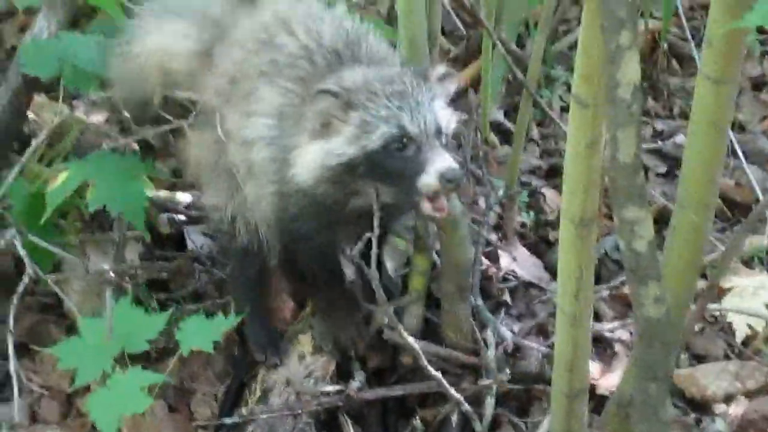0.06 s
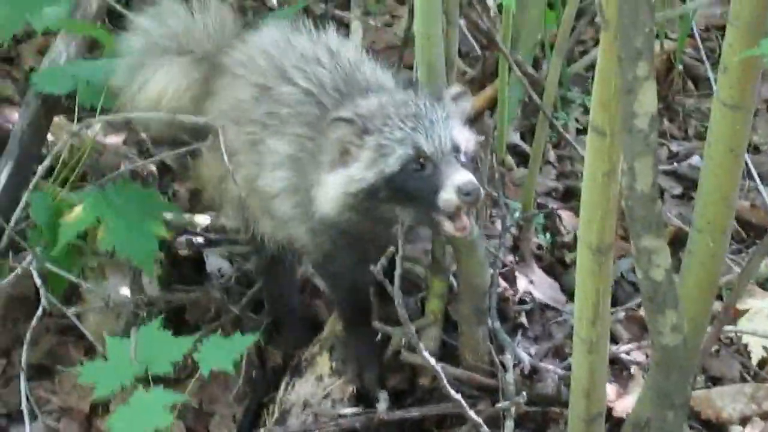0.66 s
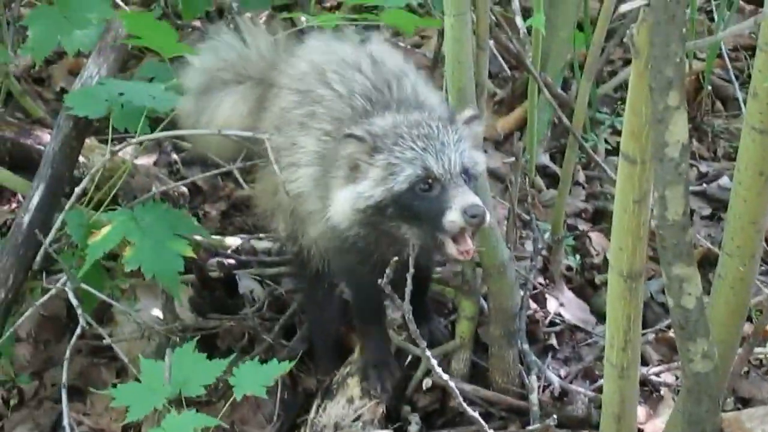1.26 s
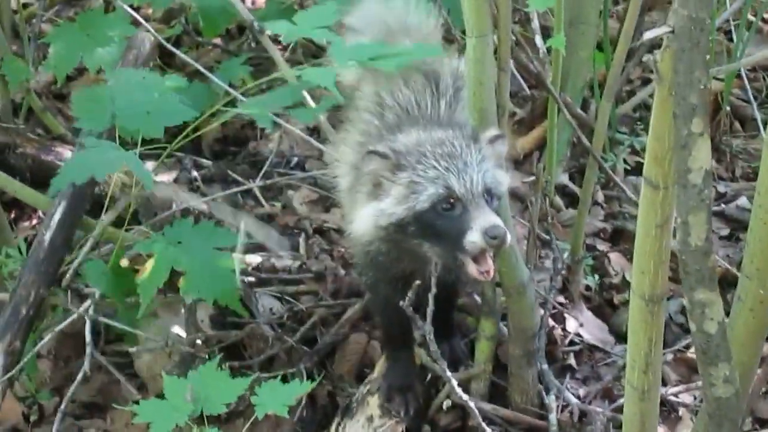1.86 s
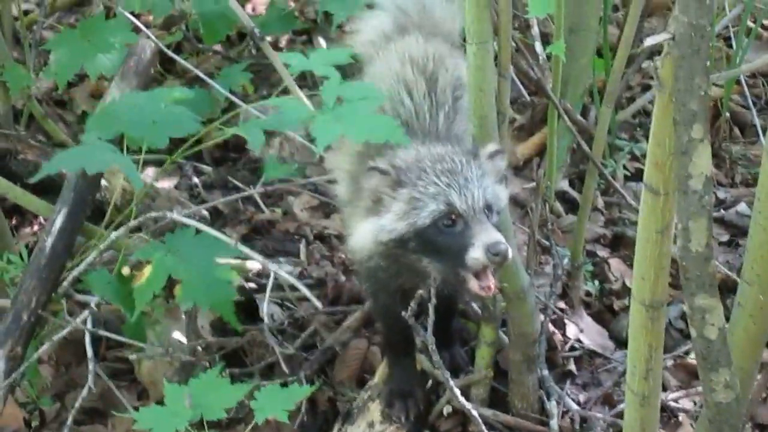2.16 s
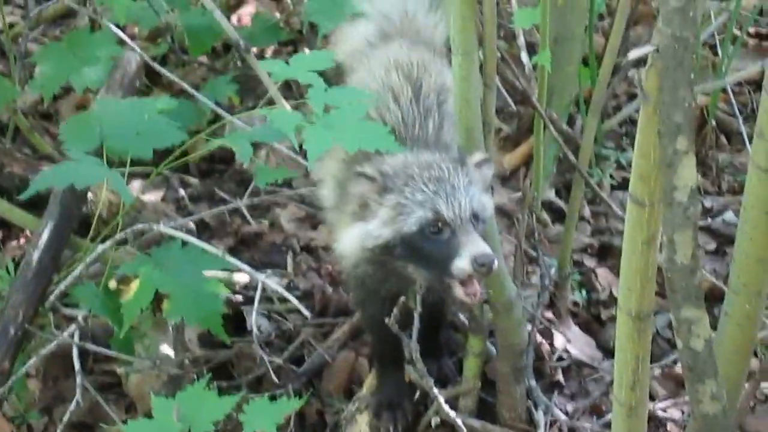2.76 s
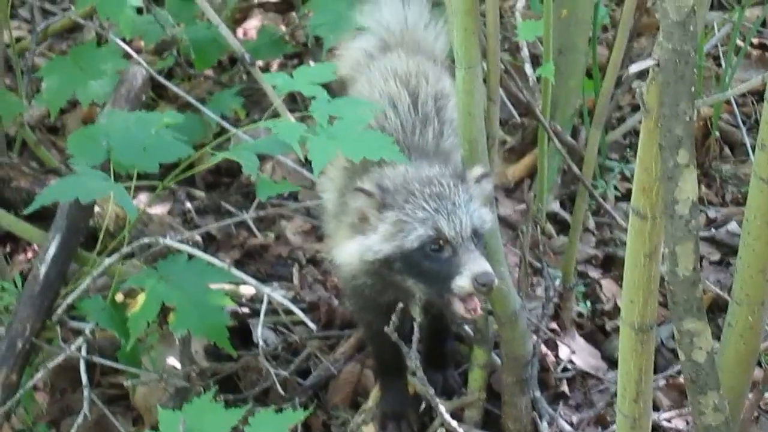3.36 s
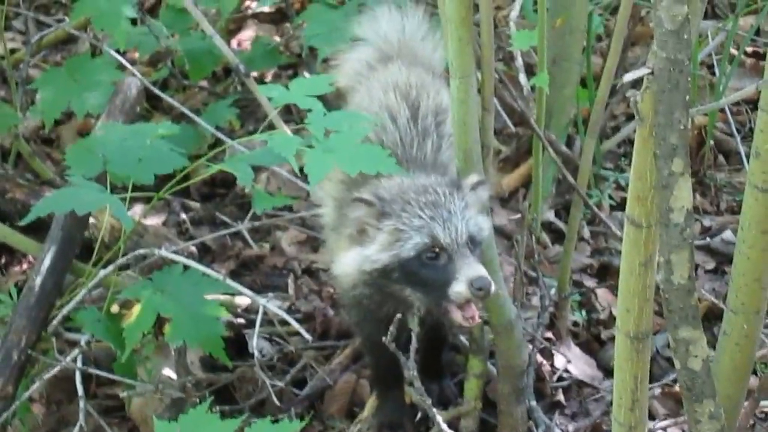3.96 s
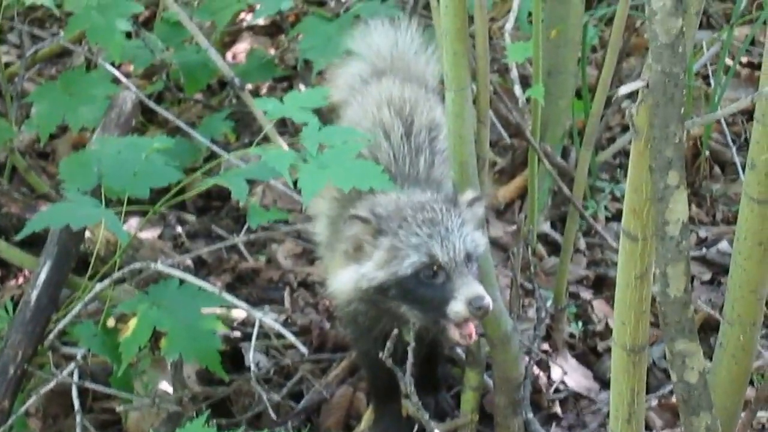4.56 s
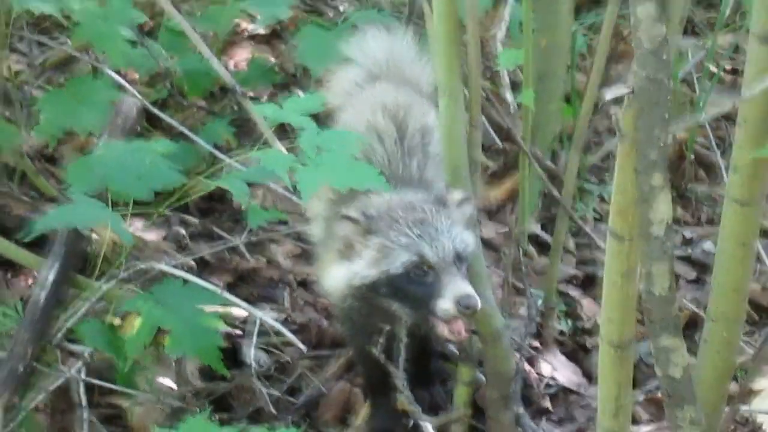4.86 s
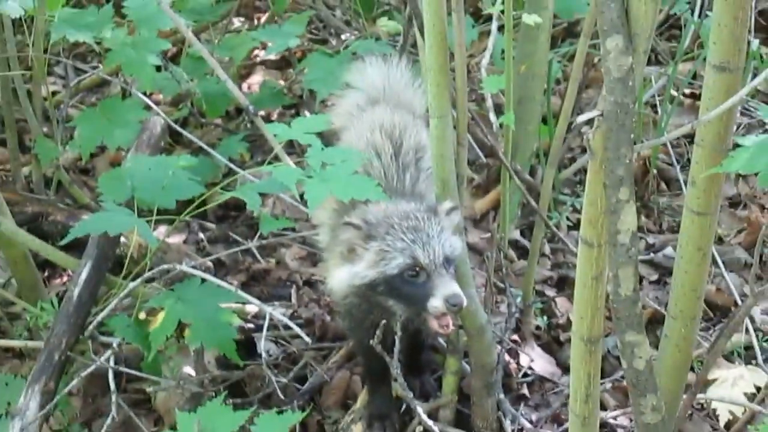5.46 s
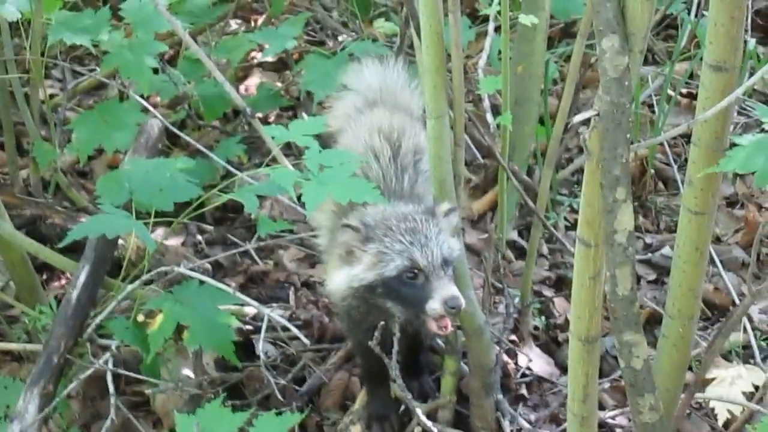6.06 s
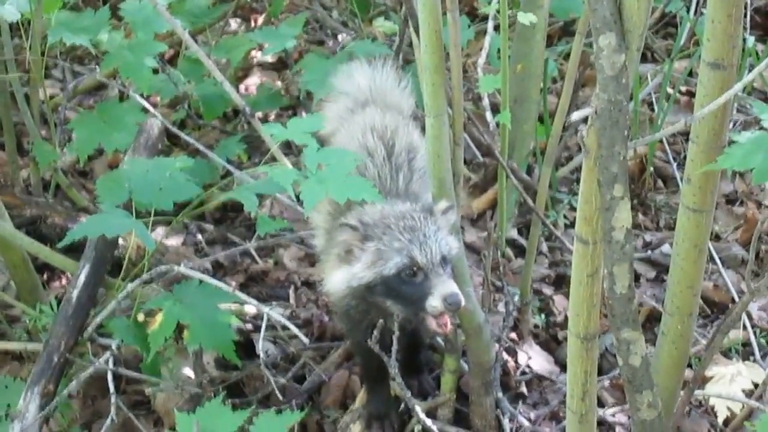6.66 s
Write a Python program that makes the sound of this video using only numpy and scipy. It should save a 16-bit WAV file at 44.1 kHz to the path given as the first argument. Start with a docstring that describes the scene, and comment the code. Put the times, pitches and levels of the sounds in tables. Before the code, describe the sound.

A raccoon dog pup yelps close by on a quiet woodland floor. Each yelp is short and hoarse, arching up in pitch, cracking at the top and falling away with a faint echo among the trees. The yelps come at about 0.2, 0.7, 1.0, 1.5, 1.9, 2.3, 2.8 and 3.3 seconds, slightly louder at 3.9 and 4.5, then further apart at 5.2 and 6.3, with a last one around 6.7. Soft hisses through the snout and a stuttering squeak sound in the first 0.7 seconds. A thin, quavering whine runs between the calls from 0.8 to 2.2 seconds. Faint low growls fill several gaps up to 4.4 seconds, followed by a run of soft grunts near 5 seconds and a small dry tick at 5.3. Dry leaves stir very faintly in the first half, over barely audible still air.

```python
"""On a woodland floor, a raccoon dog pup yelps thirteen times, close by.
Each yelp is an arch of pitch that rises out of a low growl; at its top the vocal folds break into period
doubling, and the overtones flare as they cross the resonances of jaw and mouth. Between yelps the pup
growls, whines, squeaks, grunts and hisses through its snout. Jaws and dry leaves tick, leaves stir over
a bed of still air, and reflections from the trunks let the wood ring on."""
import sys
import numpy as np
from scipy import signal
from scipy.fft import rfft, irfft, next_fast_len
from scipy.io import wavfile
from scipy.ndimage import uniform_filter1d, minimum_filter1d

SR = 44100
rng = np.random.default_rng(int(sys.argv[2]) if len(sys.argv) > 2 else 0)


def transcribe(signal):
    """Save signal, clipped to [-1, 1], as a 16-bit WAV file at the path in sys.argv[1]."""
    frames = np.atleast_2d(signal).T
    limited = np.clip(frames, -1, 1)
    pcm = np.round(limited * 32767).astype(np.int16)
    wavfile.write(sys.argv[1], SR, pcm)


N = 295470
TIME = np.arange(N) / SR

# The bed of still forest air. Each row: frequency in Hz, gain in dB.
FOREST_AIR_EQ = [(25, -8), (60, -6.5), (200, -11.5), (500, -11), (1200, -22), (2500, -23.5), (4000, -30.5),
                 (8000, -41), (15000, -42.5)]
# The tone of the echo off the trunks. Each row: frequency in Hz, gain in dB.
ECHO_EQ = [(150, -21), (480, -8.5), (720, -7), (870, -1.5), (1000, 3), (1230, -12), (1550, 4), (2000, 3.5),
           (2600, 4), (4000, 0), (6500, 4.5), (10000, -8.5)]
# Dry leaves stirring. Each row: start in seconds, end in seconds, level in dB.
RUSTLE_CUES = [(0, .12, -74), (0.488, .92, -75), (2.52, 3.15, -76)]
# The sizzle of the leaves. Each row: frequency in Hz, gain in dB.
RUSTLE_EQ = [(3000, -9.5), (4500, -4.5), (5800, 1), (6800, -6), (7900, -6.5), (8700, 3), (9400, -13.5),
             (14000, -24)]
# Small dry ticks of the jaws and leaf litter. Each row: start in seconds, relative level in dB.
TICK_CUES = [(.5082, -54.5), (2.4075, -59.5), (4.693, -60), (4.7375, -60), (4.7863, -59.5), (5.2946, -43),
             (5.3118, -36.5)]
# The snap of a tick. Each row: frequency in Hz, gain in dB.
TICK_EQ = [(1200, -24.5), (2300, 0), (3000, 5), (4200, -12), (7000, -16.5), (14000, -38.5)]
# Hisses through the snout. Each row: start in seconds, end in seconds, level in dB.
HISS_CUES = [(0, .13, -53.5), (0.4, 0.666, -48), (2.576, 2.705, -56)]
# The tone of the snout. Each row: frequency in Hz, gain in dB.
HISS_EQ = [(300, -12), (700, -2), (1200, -7), (1620, 5), (2050, -15.5), (2480, -1), (2900, -13),
           (3600, -34.5), (5000, -34), (7200, -36.5), (9000, -32.5), (13000, -52.5)]
# Bright breath in the yelps and the squeak. Each row: frequency in Hz, gain in dB.
BREATH_EQ = [(1800, -23), (3000, -5), (3700, -2.5), (4700, -1), (6200, 3.5), (7500, -6), (9000, -13),
             (11000, -12.5), (13000, -22.5), (15500, -19)]
# The whine's contour, in four joined phrases.
# Each row: time in seconds, second harmonic in Hz, relative level in dB.
WHINE_PHRASES = [
    [(0.79, 1396, -45), (0.864, 1419, -42.5), (0.878, 1367, -47), (0.93, 1432, -39.5)],
    [(1.09, 1428, -42.5), (1.19, 1549, -45), (1.274, 1494, -43.5), (1.42, 1527, -46)],
    [(1.58, 1407, -48), (1.596, 1401, -49), (1.822, 1359, -52), (1.83, 1347, -56.5)],
    [(2.02, 1371, -56.5), (2.058, 1410, -50.5), (2.138, 1419, -53.5), (2.17, 1403, -53)],
]
# The whine's nasal tone. Each row: frequency in Hz, gain in dB.
WHINE_EQ = [(450, -17), (720, -17), (1100, -8.5), (1450, -1.5), (2150, -9.5), (2900, -7.5), (3600, -26),
            (4400, -42), (6500, -54.5)]
# Growls between yelps. Each row: start in seconds, end in seconds, first pitch in Hz, last pitch in Hz,
# level in dB, mouth opening as overtone gain in dB.
GROWL_CUES = [(0.818, 0.958, 135.4, 107, -45.5, 1), (2.01, 2.202, 136.7, 114, -47.5, 0),
              (2.357, 2.449, 157.5, 106.4, -46.5, 1), (3.36, 3.437, 162.8, 109.3, -48, 2),
              (3.716, 3.825, 97, 116, -48, -1.5), (4.258, 4.365, 98.2, 114.1, -47, -10.5)]
# The growl's dark overtones. Each row: frequency in Hz, gain in dB.
GROWL_EQ = [(120, -21.5), (250, -11), (380, -1.5), (550, 5.5), (800, -16.5), (1200, -10), (1800, -21.5)]
# Hoarse air before the throat shapes it. Each row: frequency in Hz, gain in dB.
RASP_EQ = [(250, -19.5), (500, -1.5), (1200, 0.0), (2500, 15)]
# The throat's broad tone. Each row: frequency in Hz, gain in dB.
THROAT_EQ = [(60, -60.5), (180, -51.5), (280, -19), (390, -10), (490, -3), (700, 0), (950, -4.5),
             (1300, -7), (1650, -10), (2100, -17.5), (2550, -18), (2900, -36), (3400, -48.5), (5000, -78)]
# The yelps. Each row: top of the arch in seconds, top pitch in Hz, rise in seconds, release in seconds,
# relative held level in dB, period doubling in dB, jaw resonance in Hz, mouth resonance in Hz,
# nasal resonance in dB.
YELP_CUES = [(0.223, 508, .082, 0.045, -15, -11.5, 622, 1125, 1),
             (.731, 513.2, 0.083, 0.039, -12, -3.5, 599, 1150, 10.5),
             (1.030, 487, 0.086, .045, -16.5, -11, 530, 1143, -2),
             (1.516, 495.7, 0.078, 0.047, -12, -1.5, 537, 1142, 12),
             (1.931, 495, 0.075, 0.051, -13.5, -8, 565, 1150, 6),
             (2.262, 479.2, 0.071, 0.064, -13, -8.5, 540, 1213, -1.5),
             (2.803, 497.3, 0.081, 0.048, -12, -1, 576, 1196, -9.5),
             (3.285, 492, 0.076, .052, -12, -4, 616, 1239, -15.5),
             (3.903, 505.8, .087, 0.052, -9, 4, 619, 1260, -5.5),
             (4.451, 499.7, 0.091, 0.053, -10, 4, 689, 1267, -3),
             (5.248, 501, 0.083, 0.056, -14.5, 0.5, 734, 1243, -6),
             (6.254, 513.7, 0.085, 0.043, -13.5, 2, 713, 1268, -2.5),
             (6.697, 510.6, 0.079, .047, -17.5, -26, 683, 1248, -4)]

RELEASE_DB = 28   # how far a yelp drops before its muttering tail


def from_db(db):
    """Decibels to gain."""
    return 10 ** (np.asarray(db) / 20)


def rms_one(x):
    """Scale to unit rms."""
    return x / np.sqrt(np.mean(x ** 2) + 1e-20)


def level_out(x):
    """Ride the short-term level to hold it at one."""
    return x / np.sqrt(np.abs(uniform_filter1d(x ** 2, size=400)) + 1e-12)


def colour(x, eq, resonances=()):
    """Minimum-phase EQ: a broad curve plus bells, each a centre in Hz, a width in Hz and a gain in dB."""
    size = 2 * next_fast_len(len(x) // 2 + 1024)
    hz = np.arange(size // 2 + 1) * SR / size
    eq_hz, eq_db = np.transpose(eq)
    broad_db = np.interp(np.log(hz + 1), np.log(eq_hz), eq_db)
    bells_db = sum(db / (1 + (2 * (hz - centre) / width) ** 2) for centre, width, db in resonances)
    cepstrum = irfft(np.log(from_db(broad_db + bells_db)))
    cepstrum[1:size // 2] *= 2
    cepstrum[size // 2 + 1:] = 0
    return irfft(rfft(x, size) * np.exp(rfft(cepstrum)))[:len(x)]


def noise(eq, size):
    """Coloured noise of unit rms."""
    return rms_one(colour(rng.standard_normal(size), eq))


def waver(t, rate):
    """Random wandering, renewed `rate` times a second."""
    return np.interp((t - t[0]) * rate, np.arange(8192), rng.standard_normal(8192))


def held(t, start, end, fade_db_per_s):
    """A fader fully up from start to end, sloping away on both sides."""
    return from_db(-fade_db_per_s * np.maximum(0, np.maximum(start - t, t - end)))


def phase_of(hz):
    """Running phase of a moving pitch."""
    return 2 * np.pi * np.cumsum(hz) / SR


def add(out, start_s, sound):
    """Drop a sound into the mix."""
    start = max(round(start_s * SR), 0)
    out[start:start + len(sound)] += sound[:max(N - start, 0)]


def forest_air(level_db=-75):
    """Still air: a faint, dark, steady bed."""
    return from_db(level_db) * noise(FOREST_AIR_EQ, N)


def woodland_echo(x, build_s=.024, t60_s=1.34, wet_db=-30):
    """Countless weak reflections from trunks build up quickly and die away slowly."""
    t = TIME[:2 * SR]
    echoes = noise(ECHO_EQ, len(t)) * from_db(-60 * t / t60_s) * (1 - np.exp(-t / build_s))
    return from_db(wet_db) * signal.fftconvolve(x, echoes / np.linalg.norm(echoes))[:N]


def rustles(fade_db_per_s=90, grain_db=4):
    """Faint grainy stirring of dry leaves."""
    stir = sum(from_db(db) * held(TIME, start, end, fade_db_per_s) for start, end, db in RUSTLE_CUES)
    return rms_one(noise(RUSTLE_EQ, N) * from_db(grain_db * waver(TIME, 73))) * stir


def dry_ticks(cues, t60_s=.038, trim_db=2):
    """Small dry ticks of the jaws and leaf litter: each a crisp burst of noise that dies at once."""
    out, t = np.zeros(N), np.arange(2048) / SR
    for start, level_db in cues:
        add(out, start, noise(TICK_EQ, len(t)) * from_db(level_db + trim_db - 60 * t / t60_s))
    return out


def mouth_smacks(relative_db=-50.5, release_share=.84):
    """The mouth shuts with a tick late in each yelp's release."""
    shut_times = [top_s + release_share * release for top_s, _, _, release, *_ in YELP_CUES]
    return dry_ticks([(start, relative_db) for start in shut_times])


def hisses(fade_db_per_s=263.5, flutter_db=2.5):
    """Air forced through the pup's snout."""
    flow = sum(from_db(db) * held(TIME, start, end, fade_db_per_s) for start, end, db in HISS_CUES)
    return noise(HISS_EQ, N) * flow * from_db(flutter_db * waver(TIME, 60))


def grunts(start_s=4.782, pulse_s=.008, gap_s=.0408, slowing_s=.0017, level_db=-52, spread_db=1.5):
    """A slowing run of eight soft throat pulses, each sagging in pitch."""
    out, t = np.zeros(N), np.arange(0, pulse_s, 1 / SR)
    sag_hz = np.geomspace(330, 130, len(t))
    pulse = np.sin(phase_of(sag_hz)) * np.sin(np.pi * t / pulse_s)
    for k in range(8):
        add(out, start_s, pulse * from_db(level_db - spread_db * rng.standard_normal()))
        start_s += gap_s + k * slowing_s
    return out


def squeak(start_s=.379, pip_s=.0095, gap_s=.012, first_hz=1530, drop_hz=102, first_db=-31.5, loss_db=2):
    """One stuttering squeak: five breathy pips, each lower, weaker and rougher than the last."""
    out, t = np.zeros(N), np.arange(0, pip_s, 1 / SR)
    for k in range(5):
        jitter = .02 + k * .013
        phase = phase_of((first_hz - k * drop_hz) * (1 + jitter * waver(t, 1900)))
        tone = np.sin(phase) + from_db(-1) * np.sin(2 * phase) + from_db(-24) * np.sin(3 * phase)
        breath = from_db(-27) * noise(BREATH_EQ, len(t))
        pip = rms_one((tone + breath) * np.sin(np.pi * t / pip_s))
        add(out, start_s + k * gap_s, pip * from_db(first_db - k * loss_db))
    return out


def whine(quaver_hz=26.26, quaver_depth=.009, jitter=.0048, wander=.006, flutter_db=3, trim_db=1):
    """A thin quavering nasal tone; where it cracks, every third cycle differs and the pitch shakes."""
    times, *contours = np.vstack(WHINE_PHRASES).T
    second_hz, level_db = (np.interp(TIME, times, contour) for contour in contours)
    crack = .75 * held(TIME, start=1.6, end=1.82, fade_db_per_s=129)
    quaver = np.sin(2 * np.pi * quaver_hz * TIME + 2 * waver(TIME, 18)) * (1 + .5 * waver(TIME, 9.9))
    shake = jitter * waver(TIME, 500) + quaver_depth * quaver * (1 + .6 * crack)
    phase = phase_of(second_hz / 2 * (1 + shake + wander * waver(TIME, 50)))
    uneven_phase = phase + .6 * crack * np.sin(phase / 3)
    tone = sum(np.cos(k * uneven_phase) for k in range(1, 10)) * (1 + crack * np.cos(phase / 3))
    gate = held(TIME, start=.78, end=2.19, fade_db_per_s=598.5)
    gain = from_db(level_db + trim_db + flutter_db * waver(TIME, 38))
    return level_out(colour(tone, WHINE_EQ)) * gain * gate


def vocal_folds(t, pitch, doubling, jitter, shimmer):
    """Fold pulses and their phase; alternating strong and weak cycles add tones between the harmonics."""
    phase = phase_of(pitch * (1 + jitter * waver(t, 450)))
    harmonics = sum(np.cos(k * phase) for k in range(1, 15))
    between = sum(.58 ** max(k - 2, 0) * np.cos((k + .5) * phase) for k in range(1, 8))
    pulses = harmonics + doubling * (1 + .25 * waver(t, 130)) * between
    return pulses * (1 + shimmer * waver(t, 600)), phase


def growls():
    """The folds flap slowly: a chest hum, with overtones as far as the mouth is open."""
    out = np.zeros(N)
    for start, end, first_hz, last_hz, level_db, opening_db in GROWL_CUES:
        t = np.arange(0, end - start, 1 / SR)
        pitch = np.geomspace(first_hz, last_hz, len(t))
        pulses, phase = vocal_folds(t, pitch, doubling=0, jitter=.027, shimmer=.2)
        growl = np.sin(phase) + from_db(opening_db) * rms_one(colour(pulses, GROWL_EQ))
        add(out, start, growl * signal.windows.tukey(len(t), .8) * from_db(level_db))
    return out


def chest_hum(t, pitch, phase, level_db=-47.5, top_hz=195):
    """The bare fundamental under a yelp, heard while the pitch is low."""
    gate = held(t, start=-.12, end=.13, fade_db_per_s=649.5)
    return from_db(level_db) * np.sin(phase) * gate / (1 + (pitch / top_hz) ** 4)


def breath_rush(t, chop, effort_db, air_db=-51, lead_s=.0057, fade_db_per_s=130, grain_db=2):
    """Bright air that peaks just before a yelp's top, with narrow resonances that shift each time."""
    resonances = [(hz * rng.uniform(.84, 1.04), 170, 6) for hz in np.geomspace(3700, 11500, 13)]
    air = rms_one(colour(rng.standard_normal(len(t)), BREATH_EQ, resonances))
    swell_db = effort_db - fade_db_per_s * np.abs(t + lead_s)
    return air * chop * from_db(air_db + swell_db + grain_db * waver(t, 250))


def pitch_arch(t, top_hz, rise, rest_hz=83.9, fall_s=.057, wobble=.008):
    """The pitch climbs out of the folds' slow flapping, tops out at t = 0 and sinks back."""
    arch = np.where(t < 0, np.exp(-np.abs(t / rise) ** 2.1), 1 / (1 + np.abs(t / fall_s) ** 3))
    return (rest_hz + (top_hz - rest_hz) * arch) * (1 + wobble * waver(t, 90))


def effort(t, rise, release, attack_db_per_s=603.5, tail_db=23, tail_s=.11):
    """A yelp's envelope in dB: attack, hold, quick release and muttering tail."""
    attack = attack_db_per_s * np.maximum(-t - .69 * rise, 0)
    drop = RELEASE_DB * np.clip(t / release, 0, 1) ** 2.85
    tail = tail_db * (np.maximum(t - release, 0) / tail_s) ** 2
    return -attack - drop - tail


def flare(overtone_hz, resonance_hz, width_hz=65):
    """An overtone flares, from 0 to 1, as it sweeps through a resonance."""
    return np.exp(-((overtone_hz - resonance_hz) / width_hz) ** 2)


def muffle(voice, shut, corner_hz=860, shut_db=-11.5):
    """A closing mouth damps the upper overtones as `shut` goes from 0 to 1."""
    dull = signal.sosfiltfilt(signal.butter(3, corner_hz, fs=SR, output="sos"), voice)
    return dull + (voice - dull) * from_db(shut_db * shut)


def yelps(onset_db=-14.5, trim_db=-2, hoarse_db=-20, break_lead_s=.035, break_build_s=.036,
          nasal_hz=1496, low_cut_hz=210):
    """Pitch and effort swell and sink together; fold pulses and hoarse air ring the same throat."""
    out = np.zeros(N)
    t = np.arange(-int(.18 * SR), int(.22 * SR)) / SR   # zero at the top of the arch
    low_cut = signal.butter(2, low_cut_hz, "high", fs=SR, output="sos")
    for top_s, top_hz, rise, release, level_db, doubling_db, jaw_hz, mouth_hz, nasal_db in YELP_CUES:
        pitch = pitch_arch(t, top_hz, rise)
        effort_db = effort(t, rise, release)
        weak = np.clip(-effort_db / RELEASE_DB, 0, 1)
        # The folds break into doubling just before the top, and fray as the voice starts and stops.
        broken = np.clip((t + break_lead_s) / break_build_s, 0, 1) * (1 - weak ** 2)
        jitter = .011 + .012 * np.sin(np.pi * weak)
        pulses, phase = vocal_folds(t, pitch, broken * from_db(doubling_db), jitter, shimmer=.29)

        on_jaw = flare(2 * pitch, jaw_hz)
        on_mouth = flare(3 * pitch, mouth_hz) * (t < 0)   # only on the way up
        on_closing = flare(1.5 * pitch, jaw_hz) * (t > 0)   # only on the way down
        pulses += 1.6 * on_jaw * np.cos(2 * phase)
        pulses += .6 * on_mouth * np.cos(3 * phase)
        pulses += on_closing * np.cos(1.5 * phase)
        flare_db = 7 * on_mouth + on_jaw + .5 * on_closing
        resonances = [(jaw_hz, 200, 5.5), (mouth_hz, 200, 16), (nasal_hz, 57, nasal_db)]
        tone = level_out(colour(pulses, THROAT_EQ, resonances)) * from_db(flare_db)

        # Air chopped by the folds: hoarser in a weak voice, at the register break and in the flare.
        chop = 1 + .5 * np.cos(phase)
        rasp = noise(RASP_EQ, len(t)) * chop
        strain_db = 8 * weak + 4.5 * np.sin(np.pi * broken) + 5.5 * on_mouth
        hoarse = from_db(hoarse_db + strain_db) * rms_one(colour(rasp, THROAT_EQ, resonances))

        voice_db = onset_db + (level_db + trim_db - onset_db) * broken + effort_db
        voice = signal.sosfilt(low_cut, muffle(tone + hoarse, shut=weak) * from_db(voice_db))
        add(out, top_s + t[0], voice + breath_rush(t, chop, effort_db) + chest_hum(t, pitch, phase))
    return out


def scene():
    """The pup and the leaves up front, the wood around them, in mono."""
    pup = yelps() + growls() + whine() + squeak() + grunts() + mouth_smacks()
    near = pup + dry_ticks(TICK_CUES) + hisses() + rustles()
    return (near + woodland_echo(near) + forest_air())[None]


def record(dry, ceiling=.8, cutoff_hz=15760):
    """A smooth limiter holds the loudest peaks; the ends are eased and the top is cut steeply."""
    gain = minimum_filter1d(np.minimum(1, ceiling / (np.abs(dry) + 1e-9)), size=400)
    gain = uniform_filter1d(uniform_filter1d(gain, size=200), size=200)
    high_cut = signal.ellip(10, .1, 80, cutoff_hz, fs=SR, output="sos")
    return signal.sosfilt(high_cut, dry * gain * signal.windows.tukey(N, .001))


dry = scene()
out = record(dry)
transcribe(out)
```